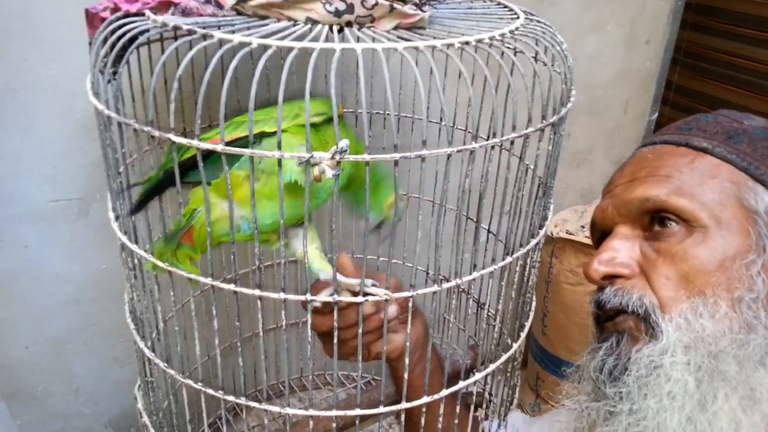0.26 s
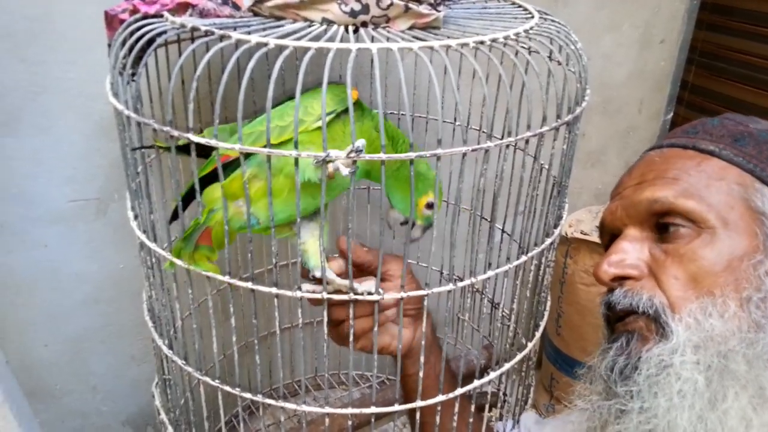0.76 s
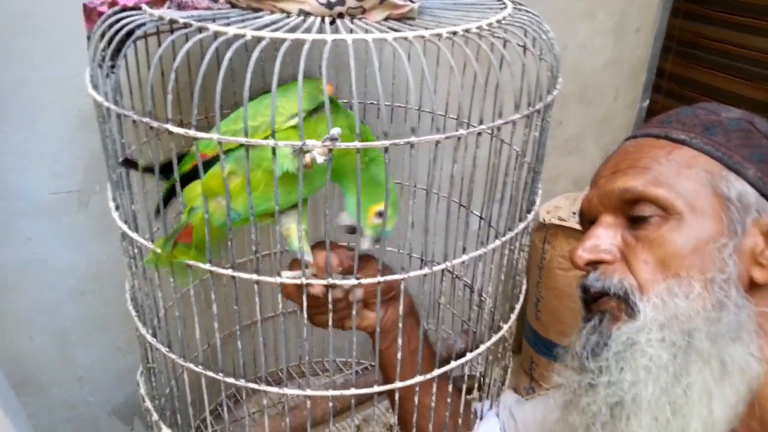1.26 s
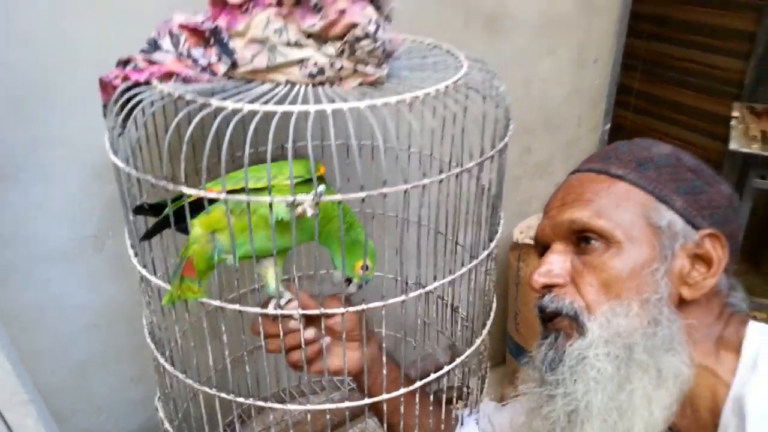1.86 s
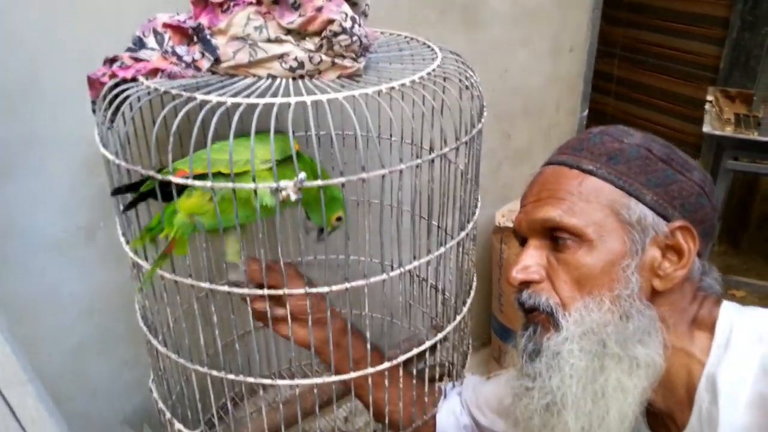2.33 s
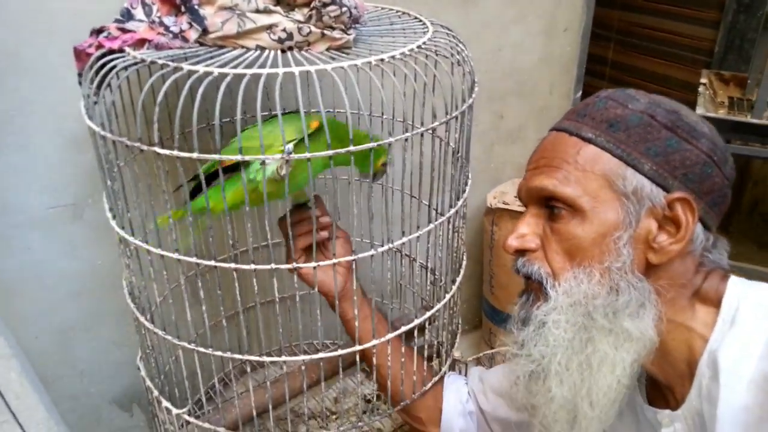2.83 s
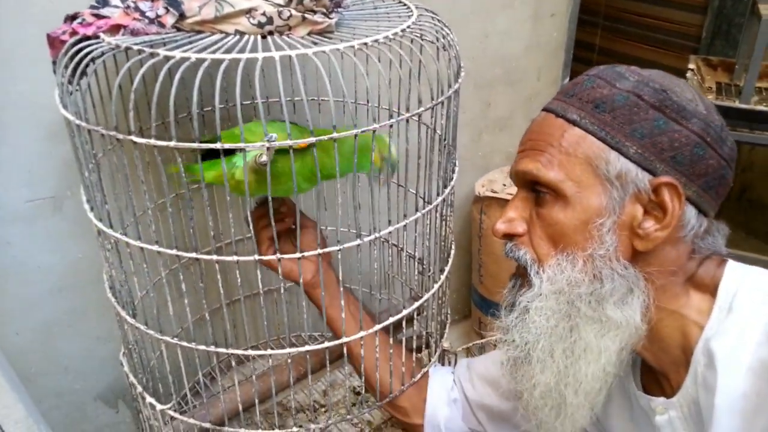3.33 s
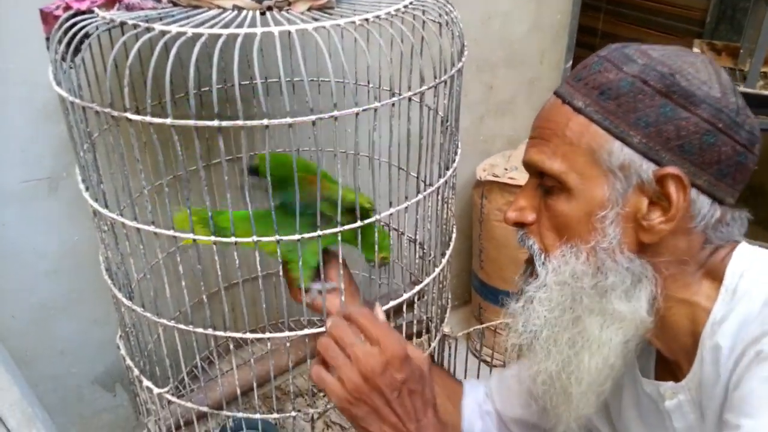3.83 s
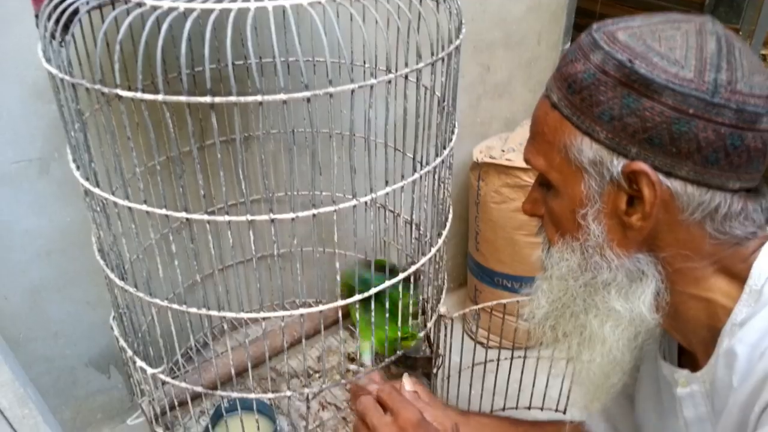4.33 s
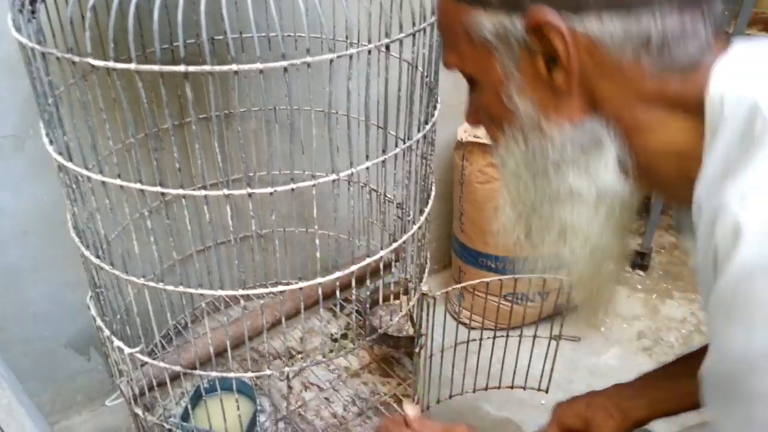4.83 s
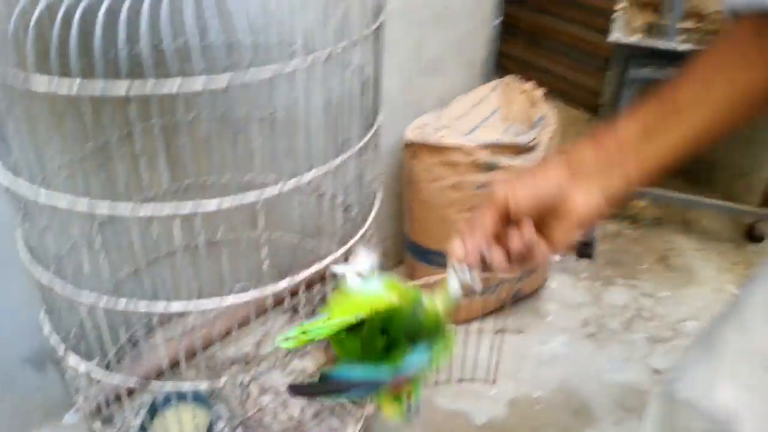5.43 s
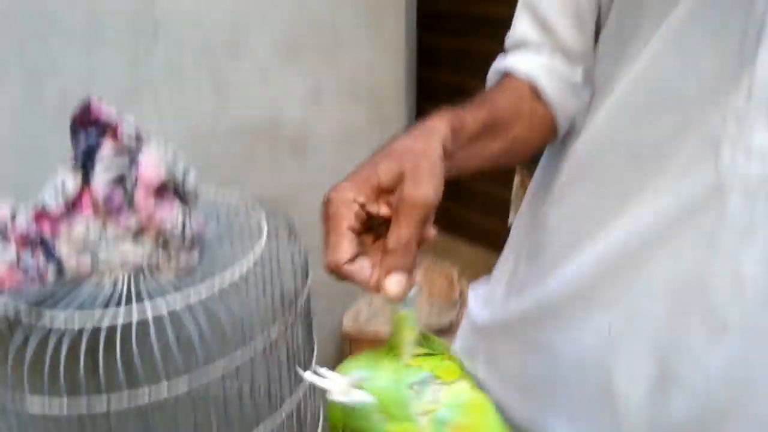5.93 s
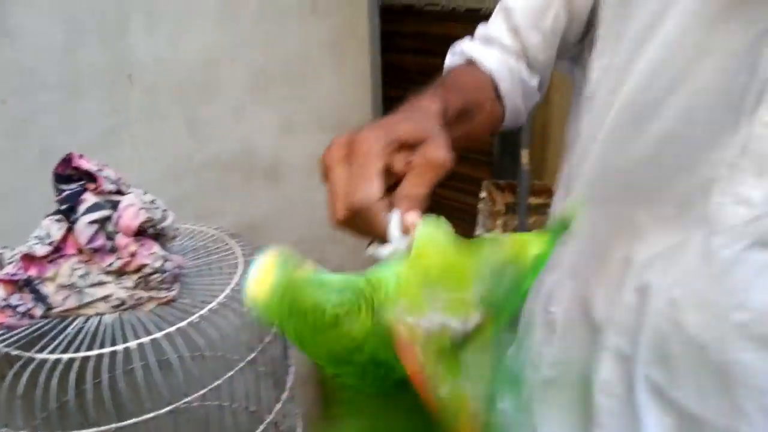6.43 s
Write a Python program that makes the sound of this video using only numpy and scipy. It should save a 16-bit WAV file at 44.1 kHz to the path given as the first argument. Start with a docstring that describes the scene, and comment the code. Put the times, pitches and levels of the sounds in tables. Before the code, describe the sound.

Feathers rustle and cage wires tick under a parrot's thin squeaks, building to wing flaps and a loud, close squawk.

```python
"""Thin squeaks and a shuffle of feathers: a parrot on a hand in a wire cage. It beats its wings as it
is drawn out, then gives one loud, broken squawk up close and fans air over the microphone.
The calls are gliding, shaking tones shaped by the throat; the wings are barb clicks and swishing air.
Beak, claws and wing tips ring the wires, and the bare walls of a small room ring after bird and cage.
Hands rub and bump underneath, over the quiet air of the house."""
import sys
import numpy as np
from scipy import signal
from scipy.fft import rfft, irfft
from scipy.io import wavfile
from scipy.ndimage import uniform_filter1d, minimum_filter1d, map_coordinates

SR = 44100
rng = np.random.default_rng(int(sys.argv[2]) if len(sys.argv) > 2 else 0)


def inscribe(sig):
    """Save sig as 16-bit PCM at rate SR to the path in sys.argv[1].

    A 1-D sig is mono; a 2-D sig holds one channel per row.
    Samples are clipped to [-1, 1] before scaling.
    """
    pcm = np.round(np.clip(np.atleast_2d(sig).T, -1, 1) * 32767)
    wavfile.write(sys.argv[1], SR, pcm.astype(np.int16))


N = 294588
TIME = np.arange(N) / SR
TOP_HZ = 15650

# ringing modes of the cage wire: pitch_hz, level_db, t60_s
WIRE_MODES = [(1680, -12, 0.023), (2680, -16, .03), (3415, -8, 0.09), (3820, -1.5, 0.053), (4140, 3, 0.029),
              (6400, 1, 0.024), (8580, -11, .015), (1714, -21, 0.93), (2722, -15.5, 0.44),
              (3394, -16, 0.32)]


def undb(db):
    """Decibels to gain."""
    return 10 ** (np.asarray(db) / 20)


def unit(x):
    """Scale to rms 1."""
    return x / np.sqrt(np.mean(x ** 2))


def fader(points):
    """Gain over time, riding through (time_s, level_db) points."""
    return undb(np.interp(TIME, *np.transpose(points)))


def response(hz, spectrum):
    """Gain of a (freq_hz, level_db) spectrum at any frequency."""
    freqs, db = np.transpose(spectrum)
    return undb(np.interp(np.log(np.maximum(hz, 1)), np.log(freqs), db))


def colour(x, spectrum):
    """Give a sound a spectrum, at rms 1."""
    return unit(irfft(rfft(x) * response(np.fft.rfftfreq(N, 1 / SR), spectrum), N))


def noise(spectrum):
    """Steady coloured noise at rms 1."""
    return colour(rng.standard_normal(N), spectrum)


def wander(rate_hz):
    """Smooth random drift with a spread near 1 and rate_hz new values a second."""
    return map_coordinates(rng.standard_normal(N), [TIME * rate_hz], order=3, mode="wrap")


def decay(t, t60):
    """Exponential fade that loses 60 dB in t60 seconds."""
    return np.exp(-np.log(1000) * t / t60)


def swell(peak_s, rise_s, gather=1.35, brake=1.01, stop_s=0.014):
    """Envelope of a movement that gathers speed and then is braked; slow ones coast longer."""
    t, fall_s = TIME - peak_s, stop_s + rise_s
    near = (t > -6 * rise_s) & (t < 10 * fall_s)
    out, t = np.zeros(N), t[near]
    out[near] = np.exp(-np.where(t < 0, np.abs(t / rise_s) ** gather, np.abs(t / fall_s) ** brake))
    return out


def room(x, t60, wet_db, gap_s=0.002, treble_hz=7500, treble_share=0.67):
    """Bare walls close by: the direct sound, then a dense tail whose treble dies a little sooner."""
    t = np.arange(SR // 2) / SR
    echoes = rng.standard_normal(len(t))
    low = signal.sosfiltfilt(signal.butter(4, treble_hz, fs=SR, output="sos"), echoes)
    tail = low * decay(t, t60) + (echoes - low) * decay(t, t60 * treble_share)
    tail *= 1 - np.exp(-(t / gap_s) ** 2)
    tail *= undb(wet_db) / np.sqrt(np.sum(tail ** 2))
    return (x + signal.fftconvolve(x, tail)[:N]) / np.sqrt(1 + undb(wet_db) ** 2)


def house_air(level_db=-61.5, drift_db=0.7):
    """Quiet air of the house, drifting slightly in level."""
    # low room tone: freq_hz, level_db
    air_spectrum = [(29, -28), (50, -7), (96, 4.5), (341, -2), (716, -9), (2260, -17), (2610, -14),
                    (2950, -18), (5240, -21), (8670, -18), (15400, -36)]
    return noise(air_spectrum) * undb(level_db + drift_db * wander(3))


def handling(swish_effort, rub_db=-0.5, kick_db=-8, uneven_db=2.5):
    """Hands and sleeves rub in dull, uneven pushes, bump the cage and take the kick of each stroke."""
    # fader ride of the rubbing: time_s, level_db
    rub_levels = [(0.0, -51), (0.36, -46), (0.65, -55), (0.98, -55), (1.29, -50), (1.57, -54), (2.47, -56),
                  (2.9, -54.5), (3.37, -56.5), (3.68, -51.5), (3.9, -57.5), (4.16, -64), (4.28, -53.5),
                  (4.66, -46.5), (4.77, -49.5), (5.51, -60.5), (6.13, -58), (6.2, -46)]
    # dull rub of skin and cloth: freq_hz, level_db
    rub_spectrum = [(20, -11), (45, -6), (80, 2.5), (130, -4), (300, -2.5), (500, -6.5), (800, -13),
                    (1500, -16.5), (4000, -26.5)]
    # the hand bumps perch and cage: peak_s, level_db
    bumps = [(.54, -62), (0.719, -48.5), (1.6, -54), (1.89, -41.5), (2.039, -45), (2.405, -59),
             (2.9, -53.5), (3.45, -50.5), (3.66, -46.5), (3.986, -53.5), (4.125, -41.5), (4.155, -42),
             (4.19, -40), (4.45, -55), (5.274, -48), (5.675, -51), (5.745, -52.5), (5.835, -54)]
    # soft thud of a bump: freq_hz, level_db
    thud_spectrum = [(30, -15), (70, -8.5), (140, -2.5), (290, -1), (500, -9), (1000, -16), (1600, -18.5),
                     (3000, -45)]
    rub = noise(rub_spectrum) * fader(rub_levels) * undb(rub_db)
    push = sum(undb(db) * swell(at, rise_s=0.011) for at, db in bumps) + undb(kick_db) * swish_effort
    return (rub + push * noise(thud_spectrum)) * undb(uneven_db * wander(45))


def gusts():
    """Air thrown by the wings buffets the microphone port."""
    # puffs that reach the microphone: peak_s, rise_s, level_db
    puffs = [(6.25, 0.012, -39), (6.38, 0.04, -43), (6.455, .012, -27.5), (6.569, 0.026, -32),
             (6.672, 0.022, -30)]
    # rumble of a puff: freq_hz, level_db
    puff_spectrum = [(15, -5), (50, 5), (110, -2.5), (200, -7.5), (330, -3.5), (600, -21), (1500, -21.5),
                     (5000, -47)]
    push = sum(undb(db) * swell(at, rise) for at, rise, db in puffs)
    return push * noise(puff_spectrum)


def wire_scrapes(width=0.18, overtone_db=-10, overtone_ratio=1.43):
    """Irregular slips excite a broad resonance of the touched wire and a weaker one above it."""
    # claws and beak slide on wires and low-toned hoops: peak_s, rise_s, pitch_hz, level_db
    slides = [ (.085, 0.023, 260, -43.5), (.24, 0.074, 243, -46.5), (.275, 0.038, 2180, -46),
              (.32, 0.045, 2650, -47), (.39, 0.017, 2950, -41), (.624, 0.0087, 3380, -56),
              (.888, .008, 3520, -55.5), (.935, .04, 2690, -64), (1.385, 0.0084, 3280, -51),
              (1.89, .025, 3540, -54), (1.985, .025, 7000, -45), (2.02, 0.033, 4430, -49),
              (2.7, 0.07, 119, -48.5), (2.75, 0.027, 3250, -53), (3.24, 0.014, 5530, -41),
              (4.3, .03, 2350, -47), (4.57, 0.087, 2520, -52), (4.699, 0.014, 4750, -28.5),
              (4.7, 0.011, 3380, -36), (4.88, .012, 8500, -48), (4.965, 0.021, 4360, -55),
              (5.33, 0.023, 5130, -51), (5.325, 0.0069, 8400, -38.5), (5.545, .006, 8600, -42.5)]
    out, slips = np.zeros(N), rng.standard_normal(N)
    for at, rise, hz, db in slides:
        main_band = signal.iirpeak(hz, 1 / width, fs=SR)
        upper_band = signal.iirpeak(hz * overtone_ratio, 1 / width, fs=SR)
        body = signal.lfilter(*main_band, signal.lfilter(*main_band, slips))  # twice for steep skirts
        overtone = signal.lfilter(*upper_band, slips)
        out += undb(db) * swell(at, rise) * (unit(body) + undb(overtone_db) * unit(overtone))
    return out


def wire_ticks(crack_db=2, crack_s=0.0018, spread_db=2, detune=0.023):
    """Each tick is a short crack that rings the wires, a little differently at each spot."""
    # beak and claws strike the wires: start_s, level_db
    ticks = [(.030, -46.5), (.403, -39), (.620, -48.5), (.884, -60), (1.334, -42), (1.654, -53.5),
             (2.036, -45), (2.810, -60), (3.655, -45), (3.772, -54), (4.12, -54), (4.197, -43),
             (4.735, -44)]
    out, t = np.zeros(N), np.arange(SR // 2) / SR
    for at, db in ticks:
        ring = np.zeros(len(t))
        for hz, mode_db, t60 in WIRE_MODES:
            louder, sharper = rng.standard_normal(2)
            tone = np.sin(2 * np.pi * hz * (1 + detune * sharper) * t)
            ring += undb(mode_db + spread_db * louder) * tone * decay(t, t60)
        crack = undb(crack_db) * rng.standard_normal(len(t)) * np.exp(-t / crack_s)
        start = int(at * SR)
        out[start:start + len(t)] += undb(db) * (ring + crack)
    return out


def bar_rattle(effort, bars=6, taps_per_s=14, spread_db=4, detune=0.13, level_db=-6):
    """Wing tips tap the bars at random, harder in strong strokes; each bar has its own tuning."""
    out, t = np.zeros(N), np.arange(SR // 2) / SR
    for tuning in np.exp(detune * np.linspace(-1.5, 1.5, bars)):
        ring = sum(undb(db) * np.sin(2 * np.pi * hz * tuning * t) * decay(t, t60)
                   for hz, db, t60 in WIRE_MODES)
        hits = rng.random(N) < taps_per_s / SR
        taps = unit(hits * undb(spread_db * rng.standard_normal(N)))
        out += signal.fftconvolve(taps * effort, ring / np.linalg.norm(ring))[:N]
    return out * undb(level_db) / np.sqrt(bars)


def wing_effort(fidget_hiss_db=-3.5, fidget_swish_db=-5.5, fade_s=0.019):
    """Envelopes of feather hiss and air swish: the strokes, and soft fidgeting between them."""
    # wing strokes: peak_s, rise_s, hiss_db, swish_db
    strokes = [ (0.032, 0.0068, -54, -55.5), (0.261, 0.052, -37, -43.5), (0.414, 0.011, -30.5, -41.5),
               (0.52, 0.011, -39.5, -49), (1.19, 0.061, -40.5, -44), (1.339, 0.0033, -42, -41),
               (1.374, 0.0081, -50, -42), (1.882, 0.017, -42.5, -53.5), (1.98, 0.04, -43, -50),
               (2.038, 0.013, -45.5, -47.5), (2.182, 0.011, -39.5, -51), (3.069, 0.011, -54, -54),
               (3.242, 0.019, -45.5, -42.5), (3.295, 0.014, -43.5, -51), (3.52, 0.029, -58.5, -60.5),
               (3.615, .024, -29, -43), (3.656, 0.0026, -35, -41.5), (3.744, 0.005, -32.5, -44.5),
               (3.782, 0.017, -40, -50.5), (4.108, 0.0025, -54, -53), (4.119, 0.0015, -35, -41.5),
               (4.155, 0.023, -35, -44.5), (4.22, 0.029, -39.5, -48), (4.3, 0.031, -39.5, -44),
               (4.362, 0.0028, -44, -54), (4.405, 0.0074, -45.5, -61), (4.535, 0.061, -37.5, -41.5),
               (4.579, 0.0058, -39, -51), (4.607, 0.031, -32.5, -46), (4.696, 0.0049, -19, -59),
               (4.738, 0.019, -27, -36.5), (4.96, 0.012, -34, -56), (5.08, 0.033, -47, -60),
               (5.142, 0.013, -39, -52.5), (5.272, 0.014, -43, -51), (5.545, 0.0067, -47, -56),
               (6.028, 0.0086, -51, -78), (6.214, 0.0043, -18.5, -29.5), (6.37, 0.074, -27.5, -43),
               (6.49, 0.0049, -39, -68), (6.568, 0.0059, -33, -39.5), (6.601, 0.0044, -37.5, -57),
               (6.672, 0.012, -33, -40)]
    # soft rustle, one fader ride for each spell of fidgeting: time_s, level_db
    fidgets = [
        [(1.68, -56), (1.69, -63), (1.714, -61), (1.73, -53), (1.74, -55), (1.758, -52), (1.824, -69),
         (1.85, -69)],
        [(2.35, -67), (2.36, -60.5), (2.428, -65.5), (2.478, -52), (2.53, -66), (2.644, -69), (2.654, -54.5),
         (2.752, -50.5), (3.04, -65)],
        [(5.7, -71), (5.806, -59.5), (5.898, -54), (5.984, -83), (6.032, -63), (6.068, -56), (6.102, -69),
         (6.132, -51.5), (6.19, -54)],
    ]
    hiss, swish = np.zeros(N), np.zeros(N)
    for at, rise, hiss_db, swish_db in strokes:
        stroke = swell(at, rise)
        hiss += undb(hiss_db) * stroke
        swish += undb(swish_db) * stroke
    for spell in fidgets:
        start_s, end_s = spell[0][0], spell[-1][0]
        gate = np.clip(np.minimum(TIME - start_s, end_s - TIME) / fade_s + 1, 0, 1)
        fidget = gate * fader(spell)
        hiss += undb(fidget_hiss_db) * fidget
        swish += undb(fidget_swish_db) * fidget
    return hiss, swish


def wings(hiss_effort, swish_effort, barbs_per_s=5000, spread_db=3, flicker_db=1.68, flicker_hz=110):
    """Feather barbs snap past each other in dense tiny clicks while the vane swishes through the air."""
    # bright hiss of the barbs: freq_hz, level_db
    hiss_spectrum = [(1500, -18), (3000, -25.5), (4500, -8.5), (6500, -1.5), (8300, 3.5), (10000, -1),
                     (12000, -18), (15500, -37)]
    # broad swish of the vane: freq_hz, level_db
    swish_spectrum = [(100, -57), (300, -4), (700, -5.5), (1200, 0), (2400, 4.5), (3500, 1.5), (6000, -1.5),
                      (12000, -30)]
    # crisp edge of stiff feather tips brushing the bars: freq_hz, level_db
    edge_spectrum = [(5000, -36), (8500, -0.5), (10500, 8), (12500, 1.5), (14000, -4), (15500, -7)]
    # fader ride of that edge, relative to the hiss: time_s, level_db
    edge_levels = [(.5, -14), (1.35, -9), (2.0, -6.5), (3.7, -6), (4.2, -5.5), (4.6, -16.5), (5.15, -6),
                   (6.5, -7)]
    snaps = (rng.random(N) < barbs_per_s / SR) * rng.standard_normal(N)
    snaps = unit(snaps * undb(spread_db * rng.standard_normal(N)))
    hiss = colour(snaps + rng.standard_normal(N), hiss_spectrum)
    swish = colour(rng.standard_normal(N) + 0.5 * snaps, swish_spectrum)
    edge = fader(edge_levels) * noise(edge_spectrum)
    out = hiss_effort * (hiss + edge) + swish_effort * swish
    # quills slip one after another, so no stroke is even
    return out * undb(flicker_db * wander(flicker_hz))


def parrot_calls(flutter_hz=750, jitter=0.062, shimmer=0.77, edge_s=0.0019, edge_share=0.096,
                 rasp_db=-4, growl_db=-36):
    """The syrinx jumps from note to note; rough notes shake in pitch and level; the throat shapes them."""
    # squeaks, then the squawk: start_s, length_s, first_hz, last_hz, level_db, roughness, overtones_db
    notes = [ (0.156, 0.023, 6070, 6050, -35, 0.16, -1), (0.181, 0.013, 5200, 5030, -35.5, 0.5, 13),
             (.194, 0.014, 3800, 3590, -39, .35, 11), (0.239, .022, 3670, 4100, -40.5, 0.9, -7),
             (.247, 0.0177, 5490, 6120, -34, .6, 0), (0.265, 0.0079, 3446, 3810, -22.5, 0.65, 10),
             (.268, .016, 3936, 3833, -23.5, 0.5, 14.5), (1.111, .06, 2990, 3205, -45, 1.05, -19),
             (1.145, 0.037, 3350, 3004, -35, 0.93, -2), (1.167, 0.041, 2814, 2856, -25.5, 0.91, 5.5),
             (2.448, 0.021, 3840, 3900, -56, 0.6, -6), (6.199, 0.011, 3534, 3430, -18.5, 0.14, -0.5),
             (6.208, .012, 3380, 3370, -10, 0.42, 5.5), (6.209, 0.0172, 5460, 4890, -17.5, .64, 5),
             (6.218, 0.03, 4350, 4196, -7.5, 0.24, 4), (6.238, 0.045, 4087, 3837, -9.5, 0.43, 1.5),
             (6.277, 0.019, 4705, 5080, -10.5, 0.14, 7), (6.289, 0.045, 5003, 5200, -8, .12, 1),
             (6.332, .071, 3205, 2974, -11.5, 0.5, 5), (6.35, 0.0515, 3462, 3400, -10, 0.55, 7.5)]
    # resonance of the throat: freq_hz, level_db
    throat = [(1000, -44), (2900, -10.5), (3500, -7), (4000, 0.5), (5200, 2), (6800, -3), (8400, -3.5),
              (10200, -10), (11800, -17.5), (15500, -46)]
    out = np.zeros(N)
    shake, throb = wander(flutter_hz), wander(flutter_hz / 2)
    rasp = undb(rasp_db) * noise(throat)
    for at, length, first_hz, last_hz, db, rough, overtones_db in notes:
        span = slice(int(at * SR), int((at + length) * SR))
        progress = np.linspace(0, 1, span.stop - span.start)
        hz = last_hz + (first_hz - last_hz) * (1 - progress) ** 2.2  # slides fast, then settles
        phase = 2 * np.pi * np.cumsum(hz * (1 + jitter * rough * shake[span])) / SR
        tone = np.zeros(len(hz))
        for k, partial_db in enumerate((0, overtones_db, overtones_db), start=1):
            tone += undb(partial_db) * response(k * hz, throat) * np.sin(k * phase) * (k * hz < TOP_HZ)
        # the period doubles twice, which leaves a faint growl two octaves down
        tone = unit(tone) + undb(growl_db) * np.sin(phase / 4)
        tone = unit(tone * np.exp(shimmer * rough * throb[span])) + rough ** 4 * rasp[span]
        # long, hoarse notes open and close more softly
        fade_share = edge_s / length + edge_share * rough
        gate = np.clip(np.minimum(progress, 1 - progress) / fade_share, 0, 1)
        out[span] += undb(db) * tone * np.sin(gate * np.pi / 2)
    return out


def scene():
    """Bird and cage ring in the room; handling and gusts stay dry, right at the microphone."""
    hiss_effort, swish_effort = wing_effort()
    calls = room(parrot_calls(), t60=0.4, wet_db=-0.5)
    rustle = wings(hiss_effort, swish_effort) + bar_rattle(swish_effort) + wire_scrapes() + wire_ticks()
    rustle = room(rustle, t60=0.37, wet_db=-7.5)
    return (calls + rustle + handling(swish_effort) + gusts() + house_air())[None]


def record(dry):
    """A limiter holds peaks at full scale, then a steep low-pass cuts the top."""
    needed_gain = 1 / np.maximum(np.abs(dry), 1)
    gain = uniform_filter1d(minimum_filter1d(needed_gain, size=65), size=65)
    return signal.sosfilt(signal.ellip(10, 0.2, 70, TOP_HZ, fs=SR, output="sos"), dry * gain)


dry = scene()
out = record(dry)
inscribe(out)
```